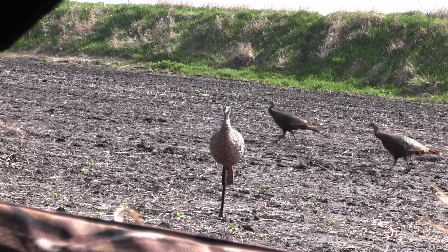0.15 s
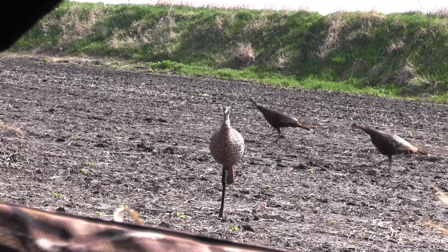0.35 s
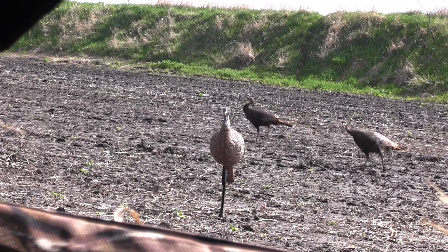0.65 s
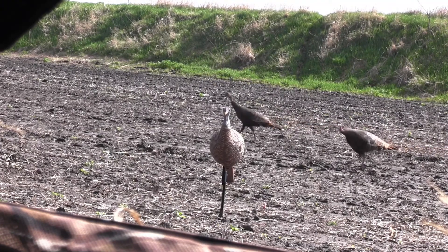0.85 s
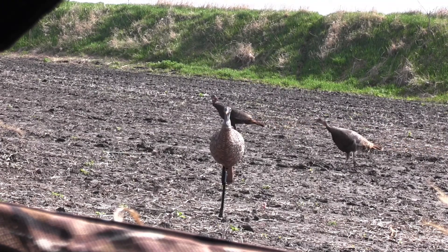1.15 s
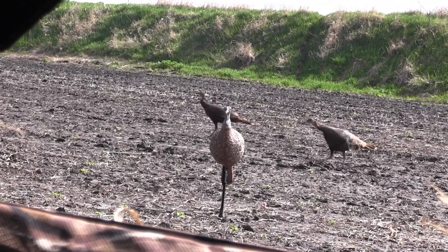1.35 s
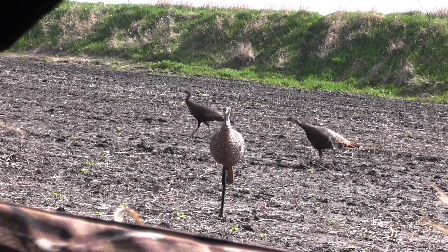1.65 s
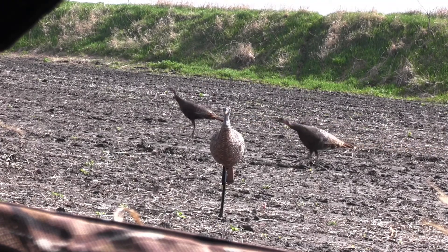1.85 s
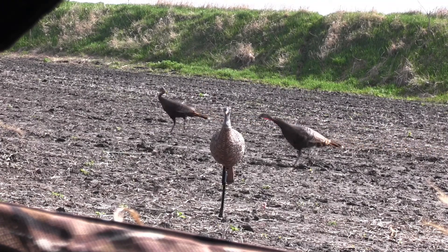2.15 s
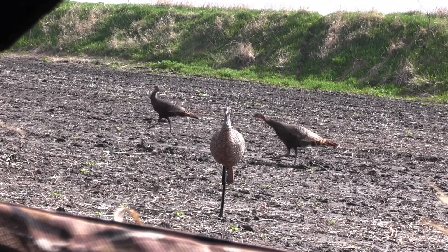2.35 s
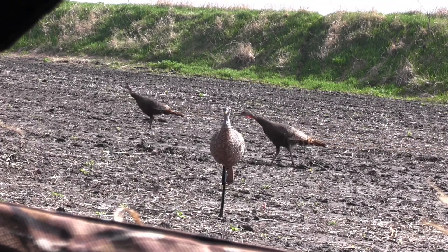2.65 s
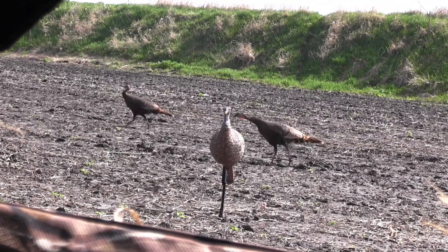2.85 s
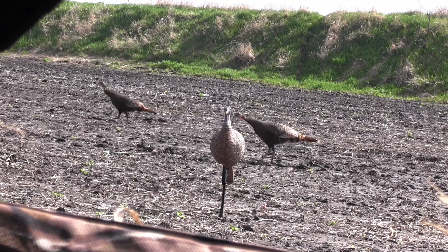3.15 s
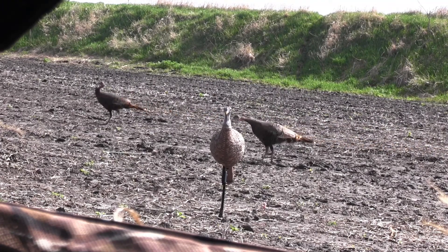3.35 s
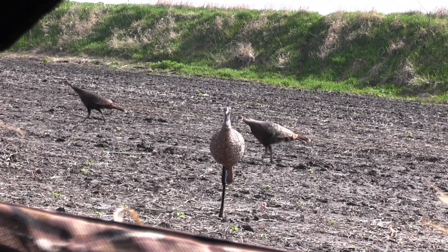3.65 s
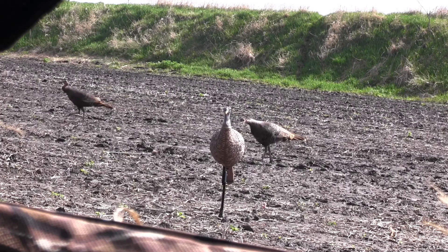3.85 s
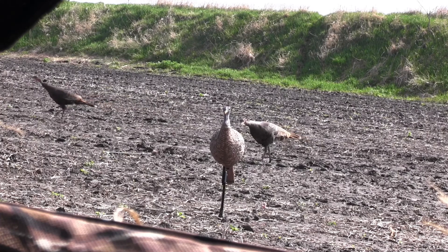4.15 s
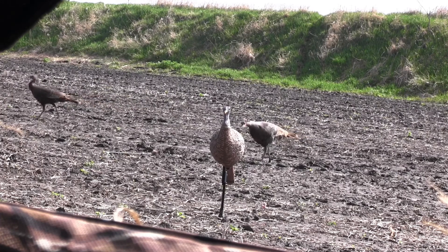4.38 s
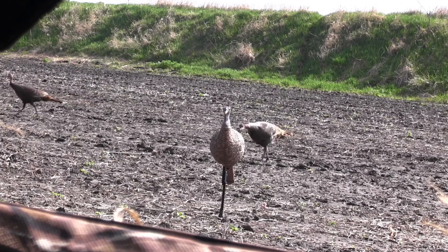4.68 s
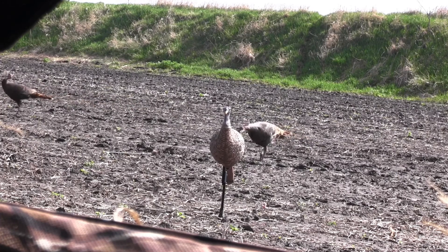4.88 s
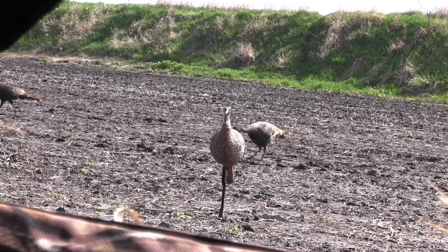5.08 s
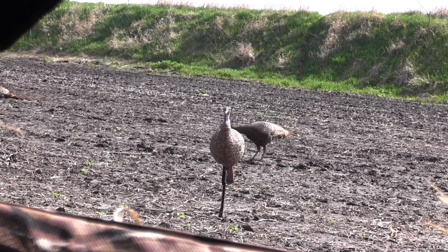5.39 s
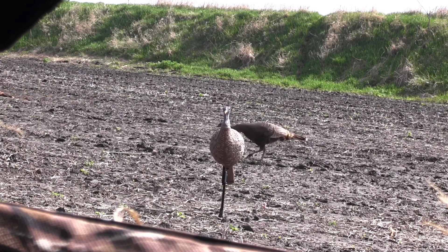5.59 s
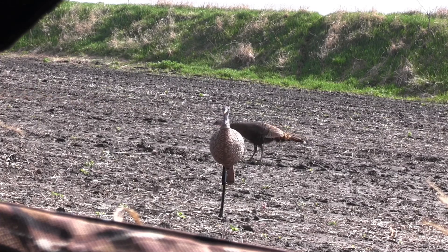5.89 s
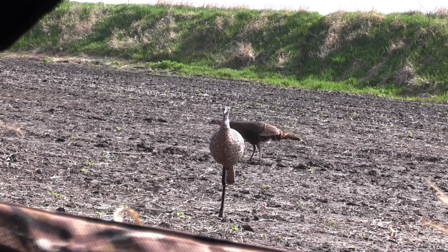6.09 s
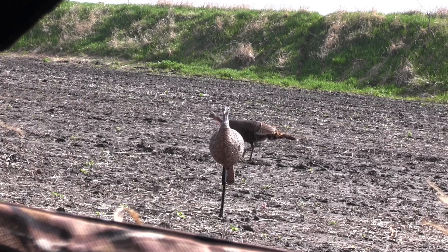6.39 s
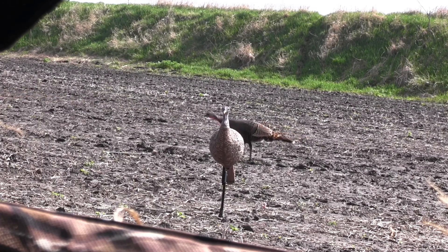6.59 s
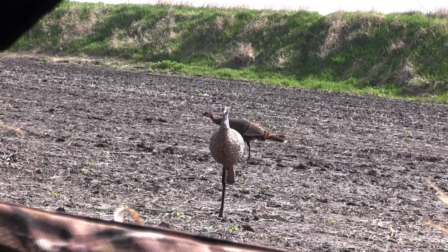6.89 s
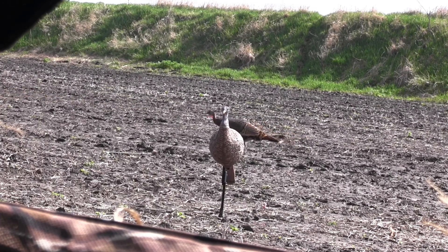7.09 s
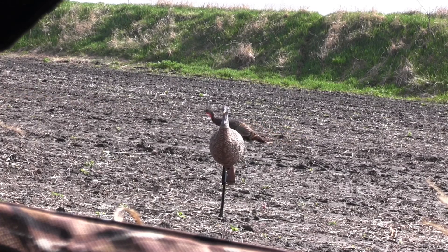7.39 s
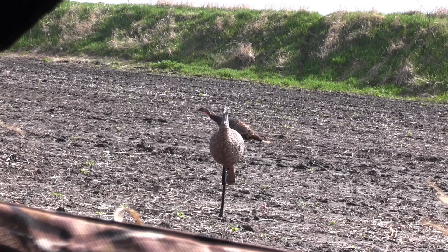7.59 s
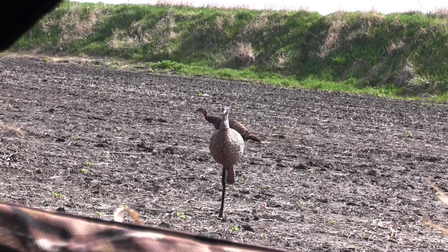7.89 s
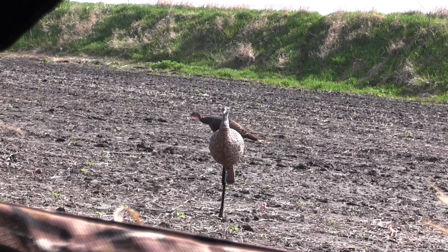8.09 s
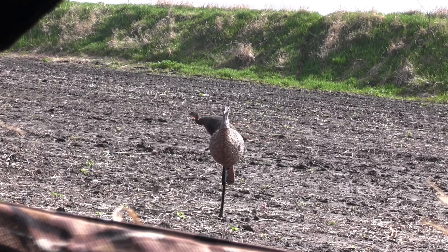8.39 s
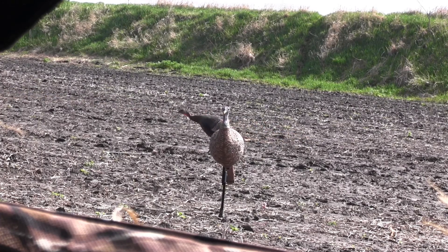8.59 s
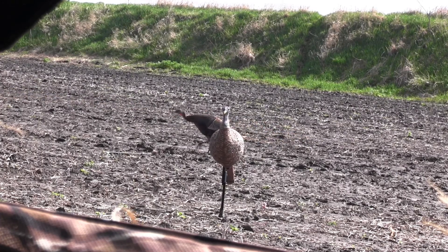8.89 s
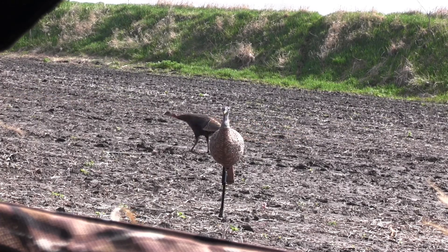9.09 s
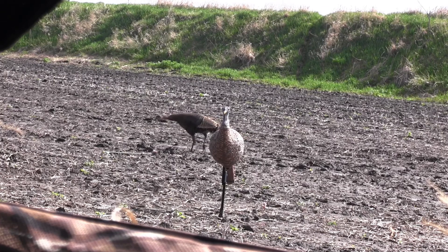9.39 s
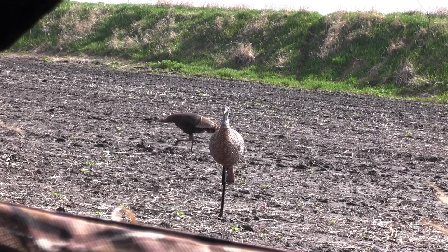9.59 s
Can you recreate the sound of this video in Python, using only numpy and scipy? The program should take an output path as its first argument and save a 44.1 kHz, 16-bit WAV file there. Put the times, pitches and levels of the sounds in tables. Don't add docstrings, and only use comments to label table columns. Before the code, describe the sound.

Quiet open field with faint rustles, dry snaps and wind hum, then a close turkey yelps loudly in a steady, raspy run of fifteen calls.

```python
import sys
import numpy as np
from scipy import signal
from scipy.fft import rfft, irfft
from scipy.io import wavfile
from scipy.ndimage import uniform_filter1d

SR = 44100
rng = np.random.default_rng(int(sys.argv[2]) if len(sys.argv) > 2 else 0)


def file_out(sig):
    cols = np.atleast_2d(sig).T
    lim = np.clip(cols, -1, 1)
    pcm = np.round(lim * 32767).astype(np.int16)
    wavfile.write(sys.argv[1], SR, pcm)


def how_loud(loudness_db):
    steps = np.asarray(loudness_db, float) / 20
    return 10 ** steps


N = 429534

# (frequency [Hz], level [dB per Hz])
AIR_SPECTRUM = [(15, -50), (28, -18), (82, -2), (113, 1), (189, -8), (300, -4), (473, -9), (928, -17),
                (2030, -19), (3670, -25), (6300, -27), (13400, -35), (15800, -41)]
# (frequency [Hz], likeness [0-1])
AIR_LIKENESS = [(60, 1), (240, 0.91), (950, 0.18), (3770, 0.7), (15000, 0.6)]
# (time [s], level [dB])
HUM_LEVEL = [(0.0, -59), (2.9, -43.5), (3.33, -56), (3.42, -47), (4.58, -52), (4.66, -44), (5.48, -51),
             (5.81, -45), (6.05, -52), (6.7, -45.5), (6.83, -63), (6.94, -44.5), (7.05, -59), (9.74, -45)]
# (start [s], length [s], level [dB])
INSECT_BOUTS = [
    (.5, 1.5, -66),
    (5.22, 1.5, -61),
    (6.9, 1.3, -72.5),
]
# (start [s], length [s], level [dB], centre [Hz], width [Hz])
SOFT_STIRS = [
    (1.25, .25, -69, 1200, 60),
    (1.69, .025, -58, 1050, 300),
    (2.085, .045, -51, 2300, 1600),
    (2.1, .03, -54, 1050, 300),
    (3.3, .8, -59, 1950, 700),
    (4.434, .012, -54, 1300, 700),
    (4.586, .012, -52, 2300, 1200),
    (5.22, .33, -66, 2300, 200),
]
# (start [s], length [s], level [dB])
CLOTH_RUBS = [
    (.45, 0.89, -60),
    (1.5, 0.48, -73),
    (4.85, .15, -68),
    (5.25, 0.18, -60),
    (5.6, 3.2, -70.5),
    (8.97, 0.048, -54.5),
]
# (time [s], peak [dB], centre [Hz], width [octaves])
STALK_SNAPS = [(0.164, -29, 2074, 2.7), (1.5861, -30.5, 2696, 2.8), (1.5969, -26.5, 13070, 4.2),
               (2.1084, -34.5, 4040, 1.4), (2.145, -30.5, 2300, 1.46), (2.919, -40, 5970, 2.46),
               (3.263, -40.5, 2440, 2), (3.3528, -22, 5560, 1.27), (3.3914, -34, 2040, 4.1),
               (3.936, -39.5, 2260, 2), (4.6544, -39, 2240, 5.5), (6.6528, -40, 1960, 2.4),
               (8.7673, -13.5, 1930, 1.77)]
# (time [s], peak [dB], centre [Hz], width [octaves])
STALK_TAPS = [
    (1.8, -36.5, 1980, 1),
    (2.709, -33.5, 2160, 0.96),
    (3.133, -37, 900, 0.75),
    (4.525, -48, 2280, 0.31),
    (4.953, -32, 1240, 0.6),
    (5.863, -32, 1780, 0.48),
]
# (start [s], voiced length [s], effort [dB], lowest pitch [Hz], slow sag [Hz])
YELP_STROKES = [(5.593, .088, -17, 655, 336.5), (5.891, 0.096, -1.5, 824.4, 206.6),
                (6.159, 0.11, -1, 721.7, 300.4), (6.446, .13, -0.9, 683.4, 319),
                (6.743, 0.12, -2.5, 693.2, 112.4), (7.036, 0.13, -2, 680.7, 88.3),
                (7.336, 0.12, -1, 730, 30.7), (7.632, 0.1, -3, 722.2, 40), (7.937, .104, -0.5, 705.8, 38.4),
                (8.239, 0.1, -0.5, 704.5, 60), (8.536, 0.12, -0.5, 725, 60), (8.833, 0.11, -1.5, 704.5, 60),
                (9.116, 0.12, -1, 708.7, 60), (9.408, 0.11, 0.5, 709.2, 60),
                (9.698, 0.095, -0.5, 693.5, 48.2)]
# (hoarseness [0-1], period doubling [dB under the partials], brightness [dB],
# crack [s], slack ending [dB])
YELP_TONES = [(0.5, -3.5, -17, 0.012, -22.5), (0.03, -2, -10.5, 0.017, -20), (0.3, -22, -4.5, .03, 0.5),
              (0.28, -30, 2, 0.025, -3), (0.3, -51, 0, 0.025, -2.5), (0.3, -30.5, 0.5, 0.024, -10.5),
              (0.09, -53, 1.5, .023, -1.7), (0.2, -49, 3.5, .02, 6), (0.2, -46, 3, .021, -1),
              (0.14, -52.5, 1.5, 0.019, -3.5), (0.18, -46, 1.5, .028, -3), (0.12, -33.5, 0, 0.022, -1),
              (0.12, -35, 0.9, .02, -3.5), (0.17, -42, -1.6, 0.02, -1.2), (0.05, -33, -3.2, 0.012, .1)]
# (frequency [Hz], level [dB])
FIRST_PARTIAL = [(675, -29), (730, -19), (900, -36.5), (1150, -23.5)]
# (frequency [Hz], level [dB])
SECOND_PARTIAL = [(1340, -14), (1405, -21.5), (1450, -11), (1570, -19.5), (1800, 3.5), (1975, -13.5),
                  (2150, 0.5), (2550, -20)]
# (frequency [Hz], level [dB])
THIRD_PARTIAL = [(2010, -14), (2110, -6), (2250, -10.5), (2450, -13.5), (2650, -28), (3000, -53.5)]
# (frequency [Hz], level [dB])
UPPER_PARTIALS = [(2400, -40), (2950, -28.5), (3700, -49.5), (4200, -74.5), (6600, -42.5), (7500, -43.5),
                  (8500, -55.5), (11000, -58), (15000, -71)]
# (frequency [Hz], width [Hz], level [dB])
THROAT_RASP = [(926, 130, -6.5), (1884, 295, 10.5), (2188, 73, 6.5), (2900, 120, -20)]
# (time [s], frequency [Hz], width [Hz])
BEAK_HISS = [
    (6.3, 9900, 1300),
    (6.5, 8800, 2200),
    (6.75, 7400, 700),
]
# (frequency [Hz], left [dB], right [dB])
PORT_COLOUR = [(500, 1, -2), (720, 2.3, -4.7), (900, 0, 0), (1450, -1.5, 1.2), (1760, 0, 0),
               (1910, -2.5, -19), (2060, 1.8, -3.3), (2180, 1.5, -2.5), (2380, 2.5, -5), (3200, .7, -.7),
               (5500, 1, -1.5), (7400, 0, 0)]


def read(points, hz, column=1):
    table = np.transpose(points)
    return np.interp(np.log(hz + 1), np.log(table[0] + 1), table[column])


def follow(rows):
    return np.interp(np.arange(N) / SR, *np.transpose(rows))


def evened(x):
    return x / np.sqrt(np.mean(abs(x) ** 2) + 1e-20)


def smoothed_twice(x, size, axis=-1):
    return uniform_filter1d(uniform_filter1d(x, size, axis), size, axis)


def add(mix, s, sound):
    part = mix[..., round(s * SR):][..., :sound.shape[-1]]
    part += sound[..., :part.shape[-1]]


def resonate(x, hz, width):
    turn = np.exp(2j * np.pi * hz * np.arange(x.shape[-1]) / SR)
    r = np.exp(-np.pi * width / SR)
    return 2 * (turn * signal.lfilter([(1 - r) ** 2], [1, -2 * r, r * r], x / turn)).real


def drift(count, hz):
    span = max(int(SR / hz), 1)
    a, b = smoothed_twice(rng.standard_normal((2, count)), span)
    return (evened(a) + 1j * evened(b)) / np.sqrt(2)


def bouts(rows, edge_s):
    t = np.arange(N) / SR
    gain = np.zeros(N)
    for s, length, db in rows:
        inside = np.minimum(t - s, s + length - t)
        gain += how_loud(db) * np.clip(inside / edge_s + 1, 0, 1) ** 2
    return gain


def air():
    frames, hz = N // 256 + 5, np.fft.rfftfreq(1024, 1 / SR)
    a, b, c, d, patches = rng.standard_normal((frames, 513, 5)).T
    patches = evened(uniform_filter1d(uniform_filter1d(patches, 10, 0), 20, 1))
    same = np.clip(read(AIR_LIKENESS, hz), -1, 1)[:, None]
    left = a + 1j * b
    right = same * left + np.sqrt(1 - same ** 2) * (c + 1j * d)
    z = np.array([left, right]) * how_loud(read(AIR_SPECTRUM, hz)[:, None] + 1.9 * patches)
    wash = signal.istft(z, nperseg=1024, noverlap=768)[1][:, :N]
    return how_loud(-49.5) * evened(wash)


def wind():
    gust = rng.standard_normal(N)
    hum = evened(resonate(gust, 280.4, 47)) + 1.5 * evened(resonate(gust, 316.5, 100))
    return how_loud(follow(HUM_LEVEL)) * evened(hum) * how_loud(np.array([[-.5], [.5]]))


def insect():
    noise = rng.standard_normal((2, N)) + rng.standard_normal(N)
    return bouts(INSECT_BOUTS, edge_s=0.2) * how_loud(-3) * evened(resonate(noise, 6280, 260))


def soft_stirs():
    noise = rng.standard_normal((2, N)) + rng.standard_normal(N)
    stirs = np.zeros((2, N))
    for s, length, db, hz, width in SOFT_STIRS:
        gain = bouts([(s, length, db)], edge_s=0.0066 + 0.14 * length)
        stirs += gain * evened(resonate(noise, hz, width))
    return stirs


def cloth():
    frames, hz = N // 128 + 5, np.fft.rfftfreq(512, 1 / SR)
    a, b, c, d, streaks = rng.standard_normal((frames, 257, 5)).T
    streaks = evened(uniform_filter1d(uniform_filter1d(streaks, 4, 0), 40, 1))
    middle, side = a + 1j * b, 0.7 * (c + 1j * d)
    z = np.array([middle + side, middle - side])
    z *= how_loud(6.4 * streaks - 4.0 * np.log2((hz[:, None] + 1) / 9500) ** 2)
    rustle = evened(signal.istft(z, nperseg=512, noverlap=384)[1][:, :N])
    return (how_loud(-74) + bouts(CLOTH_RUBS, edge_s=.12)) * rustle


def ticks():
    out, t = np.zeros((2, N)), np.arange(4096) / SR
    hz = np.fft.rfftfreq(4096, 1 / SR)
    rise = np.clip(t / .0012, 0, 1)
    for rows, t60 in ((STALK_SNAPS, .11), (STALK_TAPS, .06)):
        for s, db, centre_hz, octaves in rows:
            clicks = rng.standard_normal((3, 4096)) * how_loud(0.94 * np.minimum(rng.exponential(1, 4096), 4))
            ripple_db = 2.2 * evened(smoothed_twice(rng.standard_normal(len(hz)), 30))
            bell_db = -6 * (np.log2((hz + 1) / centre_hz) / octaves) ** 2
            colour = how_loud(ripple_db + bell_db) / np.sqrt(hz + 900)
            clumps = abs(1 + .5 * drift(4096, 300))
            shared = clicks[:2] + 1.1 * clicks[2]
            snap = evened(irfft(rfft(shared) * colour)) * clumps
            add(out, s, snap * how_loud(db - 9 - 60 * t / t60) * rise * how_loud(np.array([[.5], [-.5]])))
    return out


def stroke(length, effort_db, low_hz, sag_hz, bright_db, crack_s, ending_db):
    onset_hz, crack_hz, settle_s = 1274, 898, 0.0053
    lift_hz, lowest_at = 60, 0.61
    flip_hz, flip_rise_hz, flip_s = 825, 200.7, .012
    attack_s, attack_db, shut_s, ending_s = 0.0084, -35.5, 0.013, 0.051
    closing_db, shut_db, after_shut_db = (1, 3.5, -20), (-7.5, -26.5, -6), (-27.5, -24.5, -55)
    bright_share = (-0.055, 0.049, 0.96)

    t = np.arange(0, length + ending_s, 1 / SR)
    u = t / length
    after = np.maximum(t - length, 0)
    bowl = (1 - np.minimum(u, 1) / lowest_at) ** 2
    lift = lift_hz * (bowl / (1 - 1 / lowest_at) ** 2) ** 0.99
    hz = low_hz + np.where(u < lowest_at, sag_hz * bowl, lift)
    slide = crack_hz + (onset_hz - .9 * sag_hz - crack_hz) * np.clip(1 - t / crack_s, 0, 1) ** 1.4
    hz = hz + np.maximum(slide - hz, 0) * np.exp(-np.maximum(t - crack_s, 0) / settle_s)
    flip = flip_hz + flip_rise_hz * (1 - np.exp(-after / flip_s))

    shut = np.clip((t - length) / shut_s + 1, 0, 1)
    levels_db = []
    for k, throat in enumerate((FIRST_PARTIAL, SECOND_PARTIAL, THIRD_PARTIAL)):
        beak_db = closing_db[k] * u ** 3 + shut_db[k] * shut
        levels_db.append(read(throat, (k + 1) * hz) + beak_db + bright_db * bright_share[k])
    after_db = np.array(after_shut_db)[:, None] + ending_db - 850 * np.maximum(after - .015, 0)
    rise_s = attack_s + .00002 * sag_hz
    onset_db = attack_db * np.clip(1 - t / rise_s, 0, 1)
    levels_db = np.where(u < 1, levels_db, after_db) + effort_db + onset_db
    return t, np.where(u < 1, hz, flip), levels_db


def partials(hz, phase, levels_db, bright_db, rough, flipped):
    voice, count = np.zeros(len(hz)), len(hz)
    for k in range(1, 16):
        if k < 4:
            db = levels_db[k - 1]
            share = np.maximum(rough * min(k, 2) / 2, .8 * flipped)
        else:
            db = 0.79 * np.minimum(levels_db[2] + 10.5, 2) + read(UPPER_PARTIALS, k * hz) - 8.5
            db = db - .9 * bright_db * (k == 4)
            share = np.clip(rough + .5, 0, .95)
        chance = (drift(count, 80) + drift(count, 300)) / np.sqrt(2)
        flutter = np.sqrt(1 - share ** 2) + share * chance
        tone = (flutter * 1j ** (k + 1) * np.exp(1j * k * phase)).real
        voice += np.sqrt(2) * how_loud(db) * tone * (k * hz < 15500)
    return voice


def throat_rasp(noise, t, effort_db, rough, flipped):
    rasp = evened(sum(how_loud(db) * evened(resonate(noise, f, w)) for f, w, db in THROAT_RASP))
    return how_loud(effort_db - 30) * (1 + 14 * rough + 12 * flipped + 4 * np.exp(-t / .03)) * rasp


def beak_hiss(noise, t, start, phase, effort_db, sag_hz, bright_db):
    puffs = (1 + .9 * np.cos(phase)) * noise * abs(1 + .8 * drift(len(t), 120))
    times, centres, widths = np.transpose(BEAK_HISS)
    hiss_hz, width = np.interp(start, times, centres), np.interp(start, times, widths)
    hiss = evened(resonate(puffs, hiss_hz, width))
    hiss = hiss + .35 * evened(resonate(puffs, .85 * hiss_hz, 3000))
    spit = np.clip(2.2 - sag_hz / 70, -.9, 2) * np.exp(-(t - .013) ** 2 / .016 ** 2)
    return how_loud(-48.5 + .4 * bright_db + .45 * (effort_db + 5.5)) * hiss * (1 + spit)


def yelp(start, length, effort_db, low_hz, sag_hz, hoarse, half_db, bright_db, crack_s, ending_db):
    t, hz, levels_db = stroke(length, effort_db, low_hz, sag_hz, bright_db, crack_s, ending_db)
    hz, levels_db = uniform_filter1d(hz, size=130), uniform_filter1d(levels_db, size=130)
    flipped = np.clip((t - length) / 0.0022 + 1, 0, 1)
    breaking = np.exp(-((hz - 810) / 50) ** 2) * np.clip((0.07 - t) / 0.045, 0, 1)
    rough = np.clip(hoarse + .8 * flipped + .45 * breaking, 0, .95)
    phase = 2 * np.pi * np.cumsum(hz) / SR
    levels_db = np.minimum(levels_db, -2.5)
    effort_db = np.max(levels_db, 0)
    voice = partials(hz, phase, levels_db, bright_db, rough, flipped)
    doubling = np.clip((t - .035) / 0.0063, .05, 1)
    for k in range(1, 3):
        voice += doubling * how_loud(half_db + effort_db - 4.9 * (k + 0.5)) * np.cos((k + .5) * phase)
    noise = rng.standard_normal(len(t))
    voice += throat_rasp(noise, t, effort_db, rough, flipped)
    voice += beak_hiss(noise, t, start, phase, effort_db, sag_hz, bright_db)
    return voice * signal.windows.tukey(len(t), .05)


def turkey():
    voice = np.zeros(N)
    for row, tone in zip(YELP_STROKES, YELP_TONES):
        add(voice, row[0], yelp(*row, *tone))
    return voice


def ports(x):
    hz = np.fft.rfftfreq(4096, 1 / SR)
    gain_db = np.array([read(PORT_COLOUR, hz, column=c) for c in (1, 2)])
    cepstrum = irfft(np.log(how_loud(gain_db)))
    cepstrum[:, 1:2048] *= 2
    cepstrum[:, 2049:] = 0
    return signal.oaconvolve(x[None], irfft(np.exp(rfft(cepstrum))), axes=1)[:, :N]


def hide(x, t60, start_s):
    count = int(.3 * SR) // 20
    at = np.arange(count) * 20 + rng.integers(0, 20, (2, count))
    taps = np.zeros((2, count * 20))
    np.put_along_axis(taps, at, rng.choice([-1., 1.], at.shape), 1)
    t = np.arange(count * 20) / SR
    taps *= how_loud(-60 * t / t60) * np.clip(t / start_s, 0, 1)
    return signal.oaconvolve(x, taps / np.linalg.norm(taps[0]), axes=1)[:, :N]


def scene():
    field = air() + wind() + insect() + soft_stirs() + cloth() + ticks()
    near = how_loud(6.5) * ports(turkey())
    echoes = how_loud(-10) * hide(near, t60=0.07, start_s=0.0008)
    echoes += how_loud(-41.5) * hide(near, t60=0.36, start_s=0.022)
    return field + near + echoes


def band_limit(x):
    return signal.sosfilt(signal.butter(12, 15900, fs=SR, output="sos"), x)


def record(dry):
    power_db = 10 * np.log10(abs(uniform_filter1d((dry ** 2).mean(0), 600)) + 1e-12)
    fall = np.arange(N) * 224.0 / SR
    peak_db = np.maximum.accumulate(power_db + fall) - fall
    over_db = np.maximum(peak_db + 25.0, 0)
    ducked = dry / how_loud(0.32 * uniform_filter1d(over_db, 300))
    held = ducked / (1 + (ducked / .95) ** 8) ** (1 / 8)
    bent = held - 0.015 * held ** 3
    return band_limit(bent)


dry = scene()
out = record(dry)
file_out(out)
```